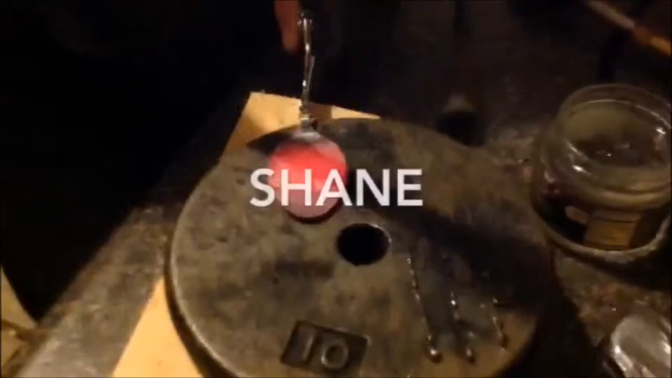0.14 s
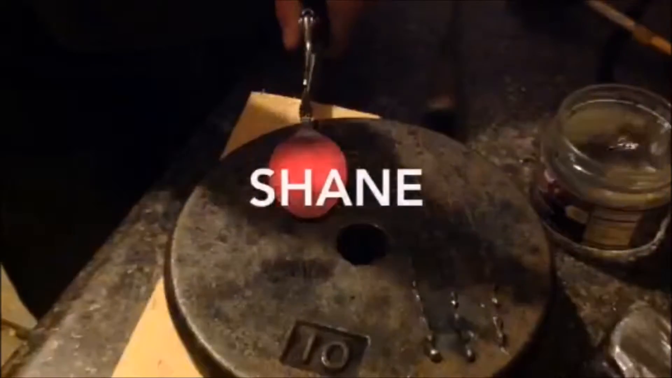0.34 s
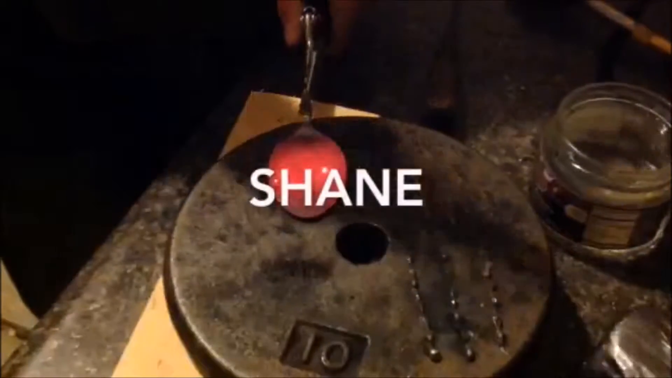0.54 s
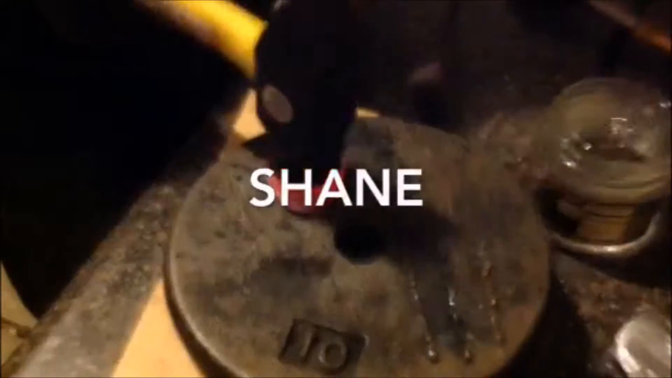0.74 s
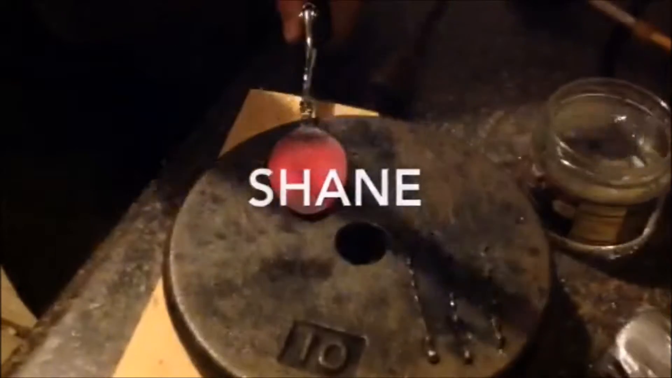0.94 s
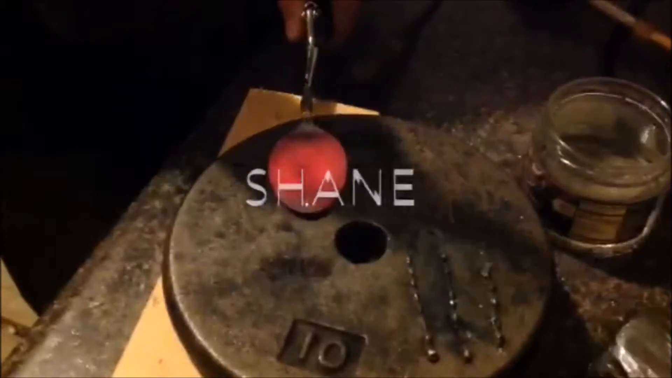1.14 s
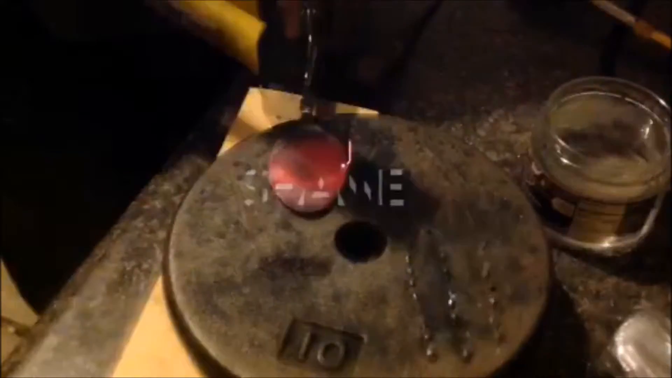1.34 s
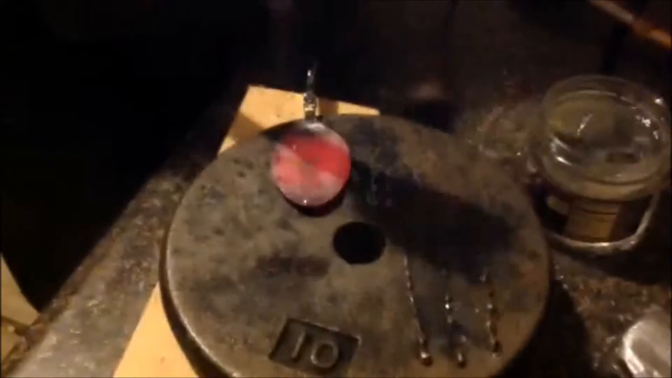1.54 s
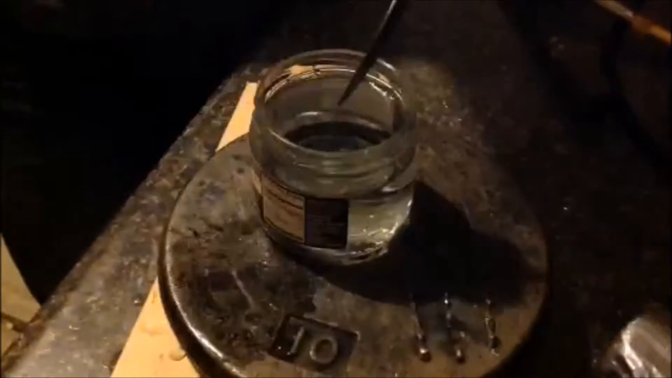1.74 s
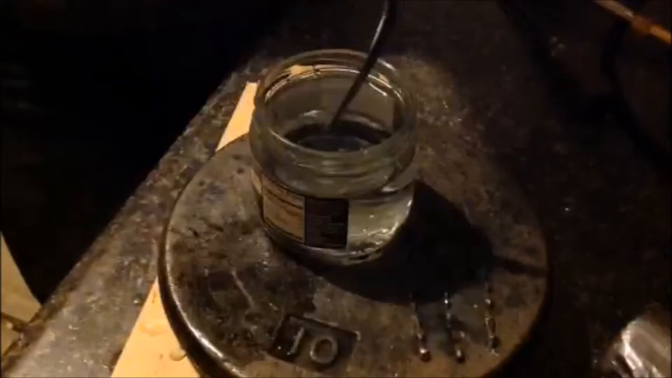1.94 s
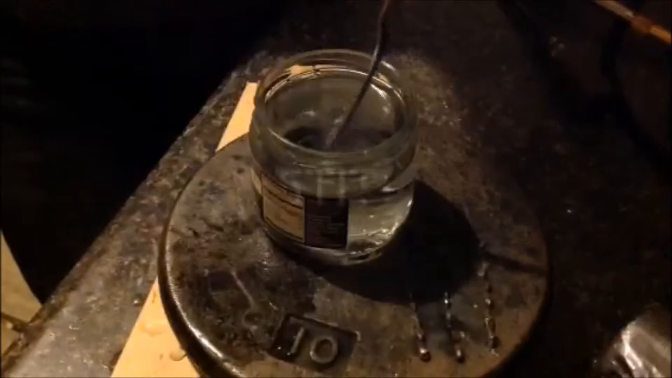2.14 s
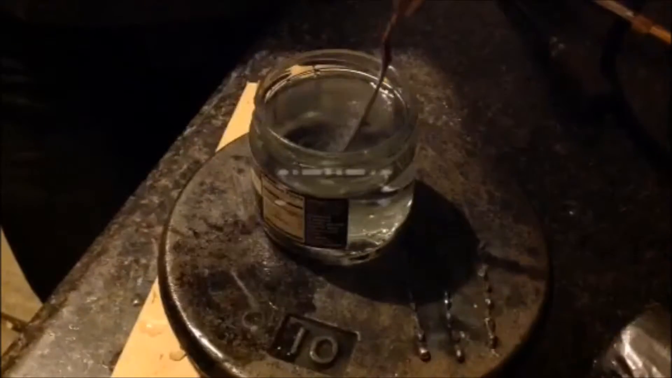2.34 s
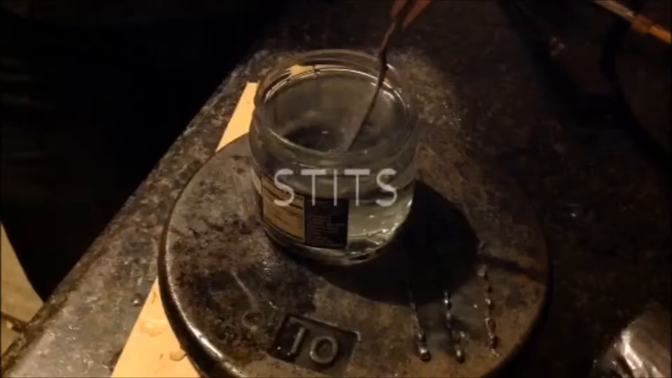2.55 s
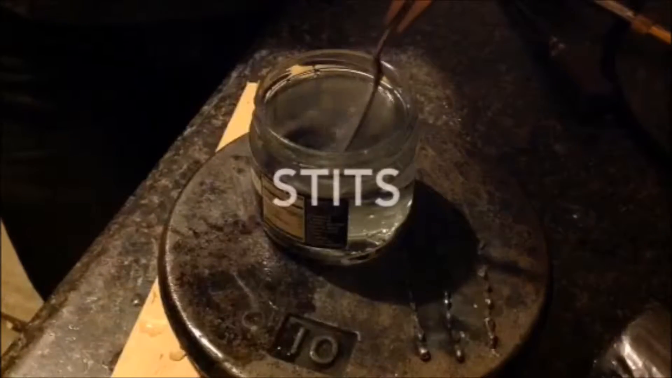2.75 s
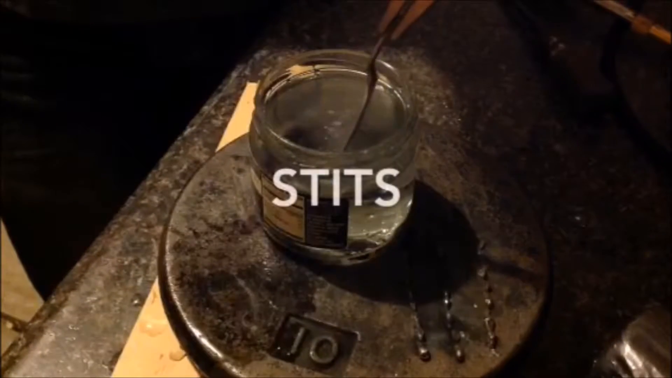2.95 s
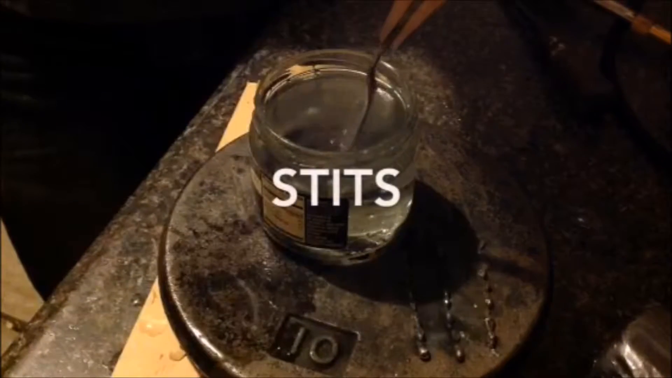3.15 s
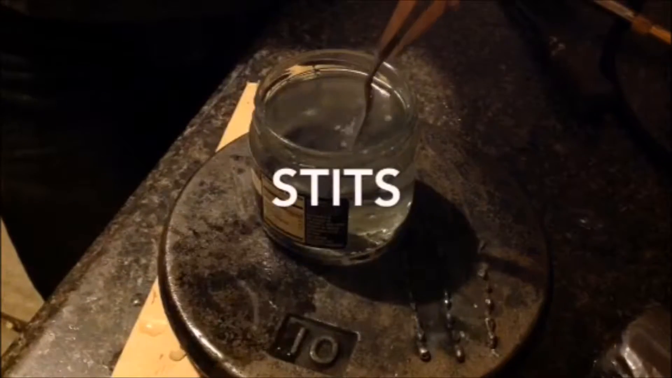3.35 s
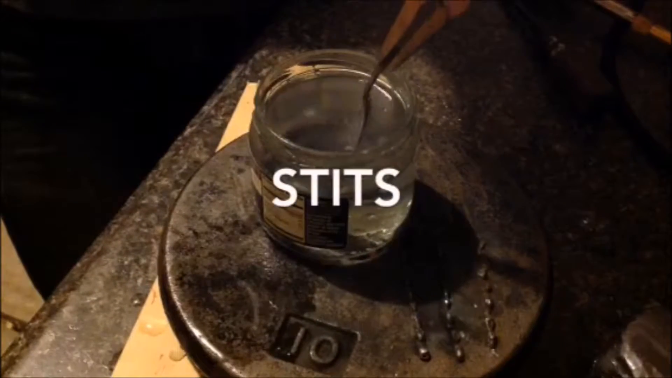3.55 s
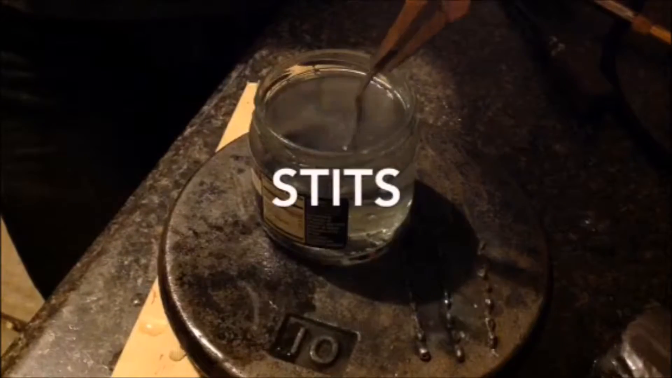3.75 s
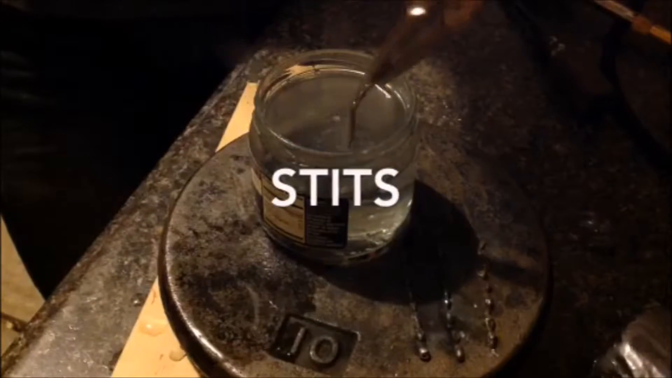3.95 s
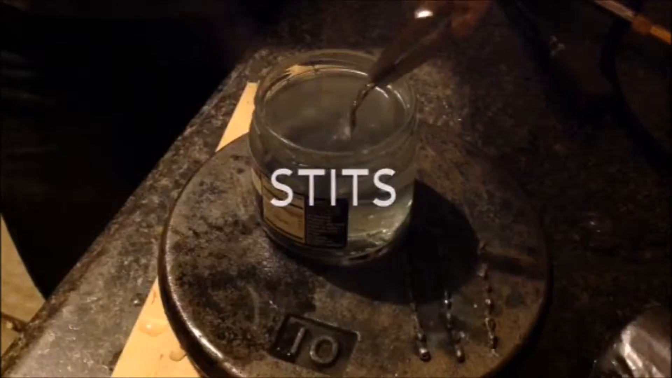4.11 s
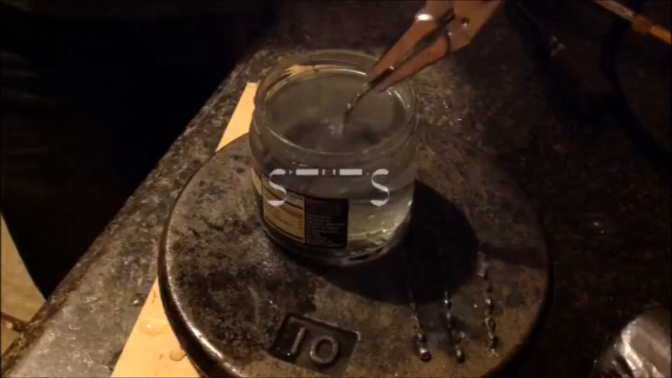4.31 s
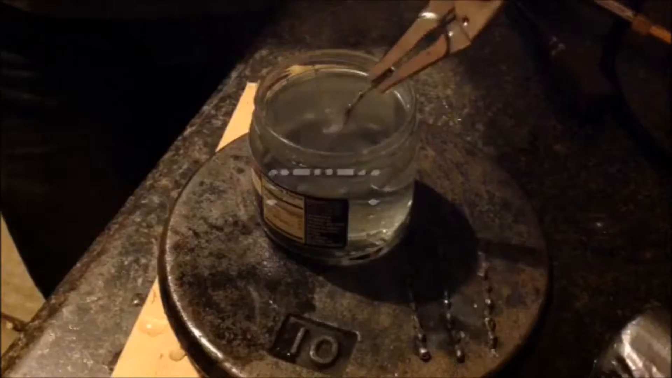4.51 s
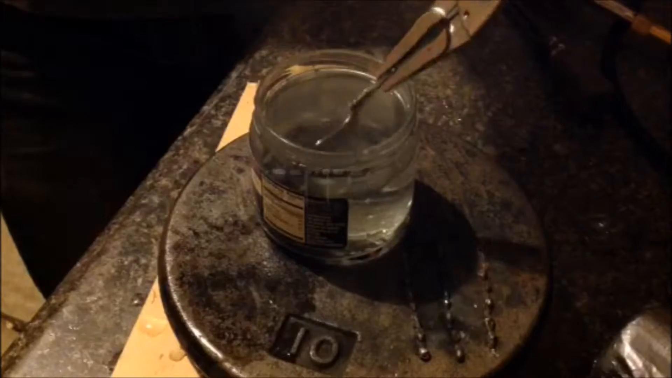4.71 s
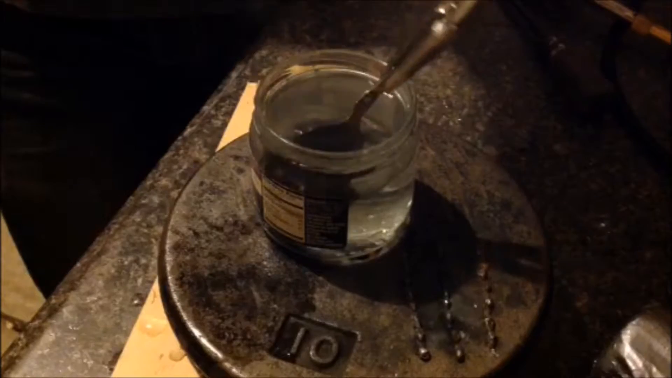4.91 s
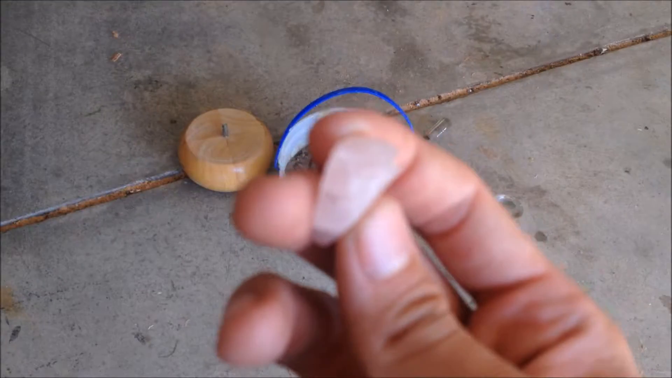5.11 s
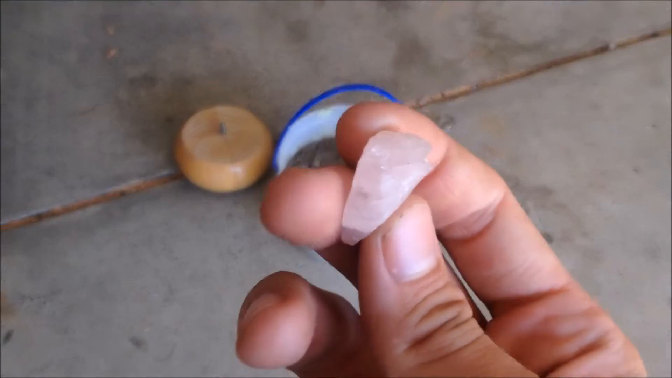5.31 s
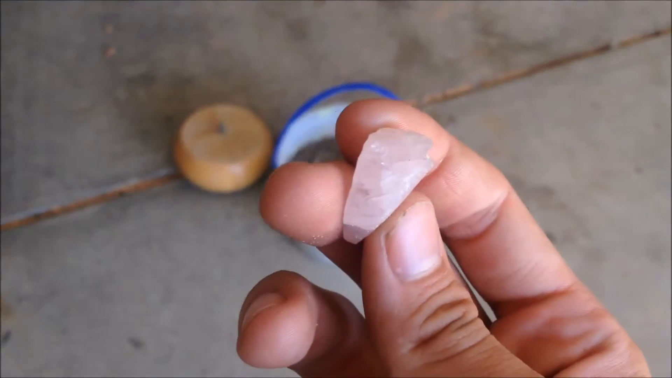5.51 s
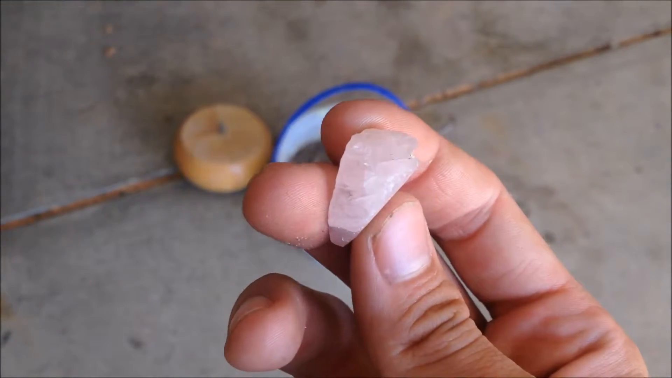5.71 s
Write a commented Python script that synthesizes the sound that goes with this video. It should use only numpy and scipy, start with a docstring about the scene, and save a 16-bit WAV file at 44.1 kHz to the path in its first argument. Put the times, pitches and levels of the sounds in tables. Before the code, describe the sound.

The sound opens on the ringing tail of an earlier hammer blow in a bare, echoing garage. Loud, harsh clanks on a loose cast-iron plate hit at about 0.07, 0.75 and 1.4 seconds, each with a noisy wash, wavering metallic ring and small rebounds between; the camera's gain control squashes the peaks. At about 1.86 the scene cuts to a near-silent lull. Just before 2.0 hot steel enters a jar of water; the hiss surges quickly, with crackling spits and a small gulp around 2.1-2.2. It dips near 2.35, then becomes a dense, bright, uneven fizz over bubbling boil, the jar singing faintly around 2.6 kHz. There is a brief dip and flare near 3.3, and soft low sloshes around 3.6, 4.4 and 4.6. The sizzle collapses after 4.75; faint glass taps ring near 5.0. From 5.1, only very quiet, low distant traffic remains, steady to the end.

```python
"""A small forge in three scenes: a bare, echoing garage, a glass jar of water, and a quiet place outdoors.
Hammer blows on a cast-iron plate are decaying noise and wavering modes that overload the camera's gain control.
Red-hot steel is then quenched: patchy noise fizzes and boils, puffs spit, water sloshes and the jar sings.
The steel taps the glass, ringing its modes; last comes far traffic, a steady band of coloured noise."""
import sys
import numpy as np
from scipy import signal
from scipy.fft import rfft, irfft, next_fast_len
from scipy.io import wavfile
from scipy.ndimage import uniform_filter1d, map_coordinates

SR = 44100
rng = np.random.default_rng(int(sys.argv[2]) if len(sys.argv) > 2 else 0)


def transcribe(signal):
    """Save signal, clipped to [-1, 1], as a 16-bit WAV file at the path in sys.argv[1]."""
    frames = np.atleast_2d(signal).T
    limited = np.clip(frames, -1, 1)
    pcm = np.round(limited * 32767).astype(np.int16)
    wavfile.write(sys.argv[1], SR, pcm)


N = 254501
TIME_S = np.arange(N) / SR

# fine bubbles bursting, spectrum shape: hz [Hz], level_db [dB per Hz]
FIZZ_SPECTRUM = [(2650, -54), (4500, -33), (5520, -46), (6640, -9), (8190, -12), (9120, -5), (12000, -6.5),
                 (14000, -0.5), (15300, -8.5)]

FORGE_END_S, JAR_END_S, OUTDOORS_START_S = 1.858, 5.0645, 5.098  # cuts between the scenes
PLUNGE_S = 1.978  # the steel enters the water


def amp(db):
    """Turns dB into gain."""
    return 10 ** (np.asarray(db) / 20)


def unit(x):
    """Scales a signal to rms 1."""
    return x / np.sqrt(np.mean(np.abs(x) ** 2) + 1e-20)


def along(points, hz):
    """Reads a curve of (Hz, value) points on a log frequency axis."""
    point_hz, value = np.transpose(points)
    return np.interp(np.log(hz + 1), np.log(point_hz + 1), value)


def curves(rows):
    """Draws one value per sample for each column after the time."""
    point_s, *columns = np.transpose(rows)
    return [np.interp(TIME_S, point_s, column) for column in columns]


def wobble(rate, size=N):
    """Interpolates random knots smoothly, rate knots a second (at most 600)."""
    knots = rng.standard_normal(size // 64)
    return map_coordinates(knots, [np.arange(size) * min(rate, 600) / SR])


def wavering(hz, rate, size=N, clear=0):
    """A tone whose strength and phase wander around a clear, steady-phase part."""
    turns = np.cumsum(np.broadcast_to(hz, size)) / SR
    wander = clear + wobble(rate, size) + 1j * wobble(rate, size)
    return np.real(wander * np.exp(2j * np.pi * turns))


def filtered(x, response):
    """Shapes x by a response given as a function of frequency."""
    size = next_fast_len(N + SR // 2)
    spectrum = rfft(x, size) * response(np.fft.rfftfreq(size, 1 / SR))
    return irfft(spectrum, size)[..., :N]


def band(centre_hz, width_hz):
    """The response of a resonance applied twice."""
    return lambda hz: (1j * hz * width_hz / (centre_hz ** 2 - hz * hz + 1j * hz * width_hz)) ** 2


def patchy(patchy_db):
    """White noise with patches of random gain over time and frequency."""
    cells = signal.stft(rng.standard_normal(N), nperseg=512)[2]
    field = uniform_filter1d(rng.standard_normal(cells.shape), size=8, axis=1)  # smooth in time
    field = uniform_filter1d(field, size=6, axis=0)  # and in frequency
    return signal.istft(cells * amp(patchy_db * unit(field)), nperseg=512)[1][:N]


def steady(spectrum, patchy_db):
    """A background of patchy noise in a fixed colour, at rms 1."""
    return unit(filtered(patchy(patchy_db), lambda hz: amp(along(spectrum, hz))))


def add(track, start_s, sound):
    """Mixes a sound in at a time, which may lie before the start."""
    i = round(start_s * SR)
    part = sound[max(-i, 0):N - i]
    track[max(i, 0):][:len(part)] += part


def fade(start_s, length_s):
    """Rises from 0 to 1 as the square of time."""
    return np.clip((TIME_S - start_s) / length_s, 0, 1) ** 2


def blow_noise(level_db, size):
    """A short direct strike plus a wash that fills the garage and dies band by band."""
    # the blow as it fills the garage, spectrum shape: hz [Hz], level_db [dB per Hz]
    clank = [(24, -54.5), (40, -43), (293, 9), (340, -2), (1990, -5), (2250, -10), (5940, -19), (6730, -17),
             (9300, -20), (12500, -14.5), (15300, -37.5)]
    # echo of the garage: hz [Hz], t60_s [s]
    garage_echo = [(60, 0.3), (250, 0.66), (1000, 0.58), (3000, 0.63), (8000, 0.45), (14000, 0.39)]
    full_tilt_db = -1.27  # dB per octave above 800 Hz, for a full strike
    dulling = .12  # extra dB per octave lost for each dB of softer contact
    hz, frame_s, cells = signal.stft(rng.standard_normal(size), SR, nperseg=256)
    hz = hz[:, None]
    wash = unit(amp(along(clank, hz))) * amp(-60 * frame_s / along(garage_echo, hz))
    tilt_db = full_tilt_db + dulling * min(level_db, 0)
    octaves = np.log2(np.maximum(hz, 800) / 3000)
    strike = amp(11 + tilt_db * octaves - 60 * frame_s / 0.096)
    return signal.istft(cells * np.hypot(wash, strike), SR, nperseg=256)[1][:size]


def metal_ring(metal_modes, size):
    """Struck metal rattles, so its decaying modes waver; each blow excites them a little differently."""
    t = np.arange(size) / SR
    clear = 1.2 * np.exp(-t / .08)  # clearest before the echoes build up
    ring = np.zeros(size)
    for hz, level_db, t60_s, rate in metal_modes:
        spread_db = rng.normal(0, 1.5)  # no two blows land on the same spot
        decay = amp(level_db + spread_db - 60 * t / t60_s)
        ring += decay * wavering(hz, rate, size, clear)
    return ring


def hammer():
    """Blows and small rebounds sound the loose plate and the thin steel; the first falls before the start."""
    # hammer contacts: start_s [s], plate_db [dB], piece_db [dB]
    blows = [(-.6, 8.5, 3), (0.0714, 4.5, 0.5), (.26, -22.5, -7), (.292, -25.5, -12), (0.467, -56, -27),
             (0.7485, 6, -6.5), (.907, -26, -6.5), (1.021, -28.5, -16), (1.089, -50.5, -33),
             (1.4163, 4.5, -8), (1.599, -44.5, 3), (1.628, -23.5, -15), (1.677, -28.5, -13)]
    # modes of the cast-iron plate: hz [Hz], level_db [dB], t60_s [s], unsteadiness [per s]
    plate_modes = [(226.8, -15, 0.61, 33), (306, -14.5, 0.77, 38), (380, -21.5, 0.94, 40),
                   (539.5, -17, 0.68, 41), (758, -28, 0.65, 40), (882, -18.5, 0.43, 52),
                   (1100, -14.5, 0.68, 65), (1240, -15, 0.58, 98), (1580, -24, 0.83, 47),
                   (2002, -2, 0.4, 55), (3190, -11, 0.53, 85), (4538, -12, 0.5, 180), (6780, -6, 0.38, 550),
                   (12280, -14, 0.46, 30), ]
    # mode of the thin steel piece: hz [Hz], level_db [dB], t60_s [s], unsteadiness [per s]
    piece_modes = [(10140, -24, 0.42, 29)]
    out, size = np.zeros(N), SR * 3 // 2
    for start_s, plate_db, piece_db in blows:
        noise = blow_noise(plate_db, size)
        rattle = amp(.9 * wobble(16, size) + 1.8 * wobble(45, size))  # the plate chatters on its base
        plate = amp(plate_db) * rattle * (noise + metal_ring(plate_modes, size))
        piece = amp(piece_db) * metal_ring(piece_modes, size)
        add(out, start_s, plate + piece)
    return out


def garage_air():
    """A dim rumble of noise and a few low wavering tones that hang in the garage."""
    # garage background, spectrum shape: hz [Hz], level_db [dB per Hz]
    rumble = [(60, -24), (200, 9.5), (450, 0), (1000, -11), (2500, -10), (5000, -39.5), (15300, -34)]
    # low hanging tones: hz [Hz], level_db [dB]
    hum_tones = [(228, -58), (312, -51.5), (485, -55.5)]
    hum = sum(amp(level_db) * wavering(hz, 7.2, clear=1.2) for hz, level_db in hum_tones)
    return amp(-47.5) * steady(rumble, patchy_db=1.5) + hum


def overload(x, knee_db=-22, slope=0.56):
    """The camera's gain control squeezes what passes its knee, and the peaks flatten."""
    power = np.abs(uniform_filter1d(x ** 2, size=800, origin=300))  # running mean over 800 samples
    level_db = 10 * np.log10(power + 1e-12)
    squeezed = x * amp(-np.maximum(level_db - knee_db, 0) * slope)
    return squeezed / (1 + np.abs(squeezed / .52) ** 4) ** (1 / 4)


def stillness():
    """A very faint coloured noise under the garage and the jar, bare in the lull before the quench."""
    # quiet background, spectrum shape: hz [Hz], level_db [dB per Hz]
    hush = [(35, -30.5), (60, -19), (349, -11.5), (1940, -5), (2950, -13.5), (12700, -8.5), (15300, -6.5)]
    return amp(-66) * steady(hush, patchy_db=1.5) * (1 - fade(OUTDOORS_START_S - .02, .012))


def jar(hz):
    """The jar and its water resonate, lifting a few bands."""
    # resonances of the water-filled jar: centre_hz [Hz], width_hz [Hz], gain_db [dB]
    jar_bands = [(537, 15, 9.5), (1935, 11, 17), (2616, 24, 10.5), (4180, 68, 9.5), (6090, 220, 10),
                 (11950, 1200, 9.5)]
    return amp(sum(gain_db / (1 + (2 * (hz - centre_hz) / width_hz) ** 2)
                   for centre_hz, width_hz, gain_db in jar_bands))


def fizz_colour(hz):
    """The spectrum of fine bursting bubbles, heard through the jar."""
    return jar(hz) * amp(along(FIZZ_SPECTRUM, hz))


def jar_song():
    """The jar sings with the boil: a sagging low tone, and high tones that sink from the plunge to a rest level."""
    # low jar tone over the boil: time_s [s], level_db [dB]
    singing = [(2.0, 3), (2.2, -7), (2.55, -13.5), (3.3, 1.5), (3.7, -13.5), (4.1, -4.5), (4.35, -8),
               (4.6, -6), (4.85, -11.5)]
    # upper jar tones: hz [Hz], unsteadiness [per s]
    high_tones = [(6130, 63), (13300, 100)]
    low_hz, sag_hz_per_s = 2630, 40
    high_db, high_fade_db_per_s, high_rest_db = 11, 89, -27
    since_s = np.maximum(TIME_S - PLUNGE_S, 0)
    pitch_hz = low_hz - sag_hz_per_s * since_s + 18 * wobble(9)
    low = amp(curves(singing)[0]) * wavering(pitch_hz, 220)
    sinking_db = np.maximum(high_db - high_fade_db_per_s * since_s, high_rest_db)
    high = amp(sinking_db) * sum(wavering(hz, rate) for hz, rate in high_tones)
    return low + high


def quench():
    """Bursting bubbles fizz and steam pockets collapse under water: patchy noise coloured by the jar."""
    # plunge, lull, full boil, dying out, last fizz at the glass: time_s [s], fizz_db [dB], boil_db [dB]
    quench_levels = [(1.97, -57, -77), (2.01, -36, -56.5), (2.05, -29.5, -41.5), (2.1, -25, -34.5),
                     (2.19, -26, -35.5), (2.36, -32.5, -38), (2.5, -26.5, -37), (2.7, -24, -37),
                     (3.15, -24, -39), (3.29, -30.5, -38), (3.37, -22.5, -37.5), (3.43, -27, -37),
                     (3.75, -24.5, -40), (4.3, -25, -38.5), (4.38, -25.5, -39.5), (4.72, -27.5, -45.5),
                     (4.79, -31, -45.5), (4.84, -42, -57.5), (4.955, -56, -63), (4.982, -46.5, -62),
                     (5.07, -44.5, -56)]
    # steam pockets collapsing, spectrum shape: hz [Hz], level_db [dB per Hz]
    boil_spectrum = [(35, -79), (60, -40), (337, -22.5), (550, -17.5), (933, -18), (1140, -8), (1820, -9),
                     (2590, -3.5), (3210, -4), (6500, -9), (8450, -13), (14300, -120)]
    fizz_db, boil_db = curves(quench_levels)
    fizz_surge_db = 0.23 * wobble(7.2) + 0.95 * wobble(25.14) + 0.87 * wobble(120)
    boil_surge_db = 1.1 * wobble(40)
    bursts = (rng.random(N) < 400 / SR) * 2.3 * rng.standard_normal(N)  # about 400 small bubbles a second
    fizz = unit(filtered(patchy(patchy_db=2.0) + bursts, fizz_colour))
    boil = unit(filtered(patchy(patchy_db=1.5), lambda hz: jar(hz) * amp(along(boil_spectrum, hz))))
    surface = amp(fizz_db + fizz_surge_db) * fizz
    under_water = amp(boil_db + boil_surge_db) * (boil + jar_song())
    return (surface + under_water) * fade(PLUNGE_S, 0.012)


def sputter():
    """Steam pockets spit as short noise puffs around 3 kHz with a treble spray."""
    # first sputters: start_s [s], level_db [dB]
    spits = [(2.058, -22), (2.068, -27.5), (2.098, -15), (2.104, -9), (2.109, -8.5), (2.124, -7),
             (2.134, -25.5), (2.138, -9), (2.147, -7.5), (2.158, -16), (2.166, -36)]
    puffs, t = np.zeros(N), np.arange(SR // 8) / SR
    for start_s, level_db in spits:
        envelope = amp(level_db - 60 * t / 0.058) * (1 - np.exp(-t / 0.0015))
        add(puffs, start_s, envelope * rng.standard_normal(len(t)))
    spray = amp(-5.5) * filtered(puffs, fizz_colour)
    return filtered(puffs, band(2870, 1720)) + spray


def slosh():
    """Displaced and stirred water gulps: swells of noise in a wide band around each pitch."""
    # gulps of water: centre_s [s], level_db [dB], pitch_hz [Hz]
    gulps = [(2.138, -38, 450), (2.155, -24.5, 470), (2.173, -42, 450), (3.569, -38, 200),
             (4.018, -62, 230), (4.368, -39, 149.4), (4.609, -39, 180)]
    out, t = np.zeros(N), np.arange(SR // 8) / SR
    hz = np.fft.rfftfreq(len(t), 1 / SR)
    for centre_s, level_db, pitch_hz in gulps:
        swell = np.sin(np.pi * np.clip(t / 0.066, 0, 1)) ** 2 * rng.standard_normal(len(t))
        gulp = irfft(rfft(swell) * band(pitch_hz, 1.6 * pitch_hz)(hz), len(t))
        add(out, centre_s - .035, amp(level_db) * gulp)
    return out


def taps():
    """The cooled steel touches the glass and rings its modes over a dull knock."""
    # steel against glass: start_s [s], level_db [dB]
    touches = [(4.9759, -38.5), (4.984, -36.5), (5.022, -48.5)]
    # modes of the glass: hz [Hz], relative level_db [dB], t60_s [s]
    glass_modes = [(557, -4.5, 0.12), (880, -4.5, .08), (1660, -20, 0.63), (1927, -6.5, 0.73),
                   (2580, -8, 0.19), (11900, -14, .15)]
    out, t = np.zeros(N), np.arange(SR // 3) / SR
    for start_s, tap_db in touches:
        ring = sum(amp(level_db - 7.5 - 60 * t / t60_s) * wavering(hz, 40, len(t), clear=1.05)
                   for hz, level_db, t60_s in glass_modes)
        ring = ring * (1 - np.exp(-t / 0.002))  # soft onset
        knock = uniform_filter1d(rng.standard_normal(len(t)), size=7)  # averaging dulls the noise
        add(out, start_s, amp(tap_db) * (ring + amp(-60 * t / 0.12) * knock))
    return out


def far_traffic():
    """Distant traffic is a low-heavy noise bed that swells in quickly after the cut."""
    # far traffic, spectrum shape: hz [Hz], level_db [dB per Hz]
    traffic = [(30, -49.5), (120, -21.5), (185, -3.5), (250, -5.5), (320, -15), (600, -17.5), (1000, -20.5),
               (1200, -24.5), (3000, -33), (8000, -42.5), (15300, -49)]
    level_db, rise_db, rise_s = -55, 7.5, 0.048
    since_s = np.maximum(TIME_S - OUTDOORS_START_S, 0)
    swell_db = -rise_db * np.exp(-since_s / rise_s)
    return amp(level_db + swell_db) * steady(traffic, patchy_db=1.3) * fade(OUTDOORS_START_S - .002, .004)


def microphone(x):
    """The small capsule loses the deep bass: two first-order high-passes at 95 Hz."""
    return filtered(x, lambda hz: (1j * hz / (95 + 1j * hz)) ** 2)


def scene():
    """Garage, jar and outdoors in turn, joined by short fades."""
    forge = overload(microphone(hammer() + garage_air()))
    forge = forge * (1 - fade(FORGE_END_S - .03, 0.037)) ** 2
    water = microphone(quench() + sputter() + slosh() + taps())
    water = water * (1 - fade(JAR_END_S, .001))
    return (forge + water + stillness() + far_traffic())[None]


def record(dry):
    """The camera's band limit cuts the treble steeply above its top frequency."""
    top_hz = 15350

    def band_limit(hz):
        slope_db = -70 * np.clip((hz - top_hz) / 300, 0, 1)
        return amp(slope_db - 60 * (hz > 16300))

    return filtered(dry, band_limit)


dry = scene()
out = record(dry)
transcribe(out)
```